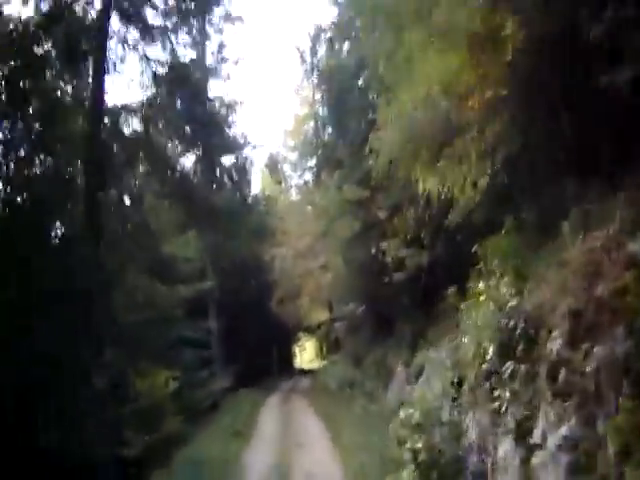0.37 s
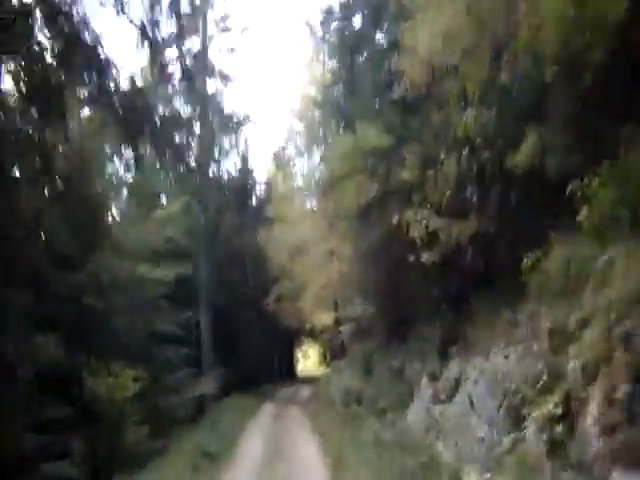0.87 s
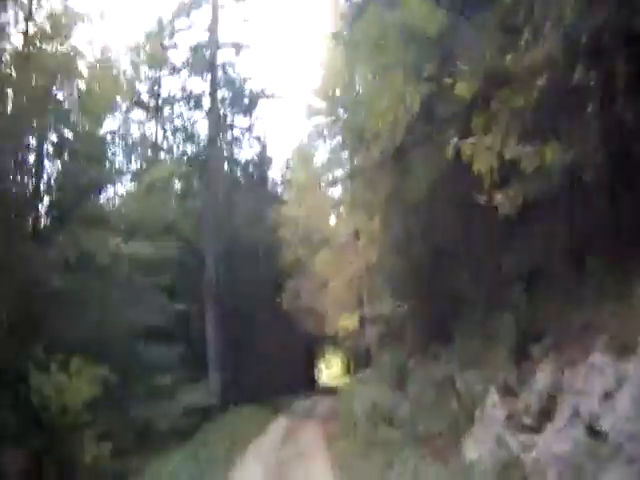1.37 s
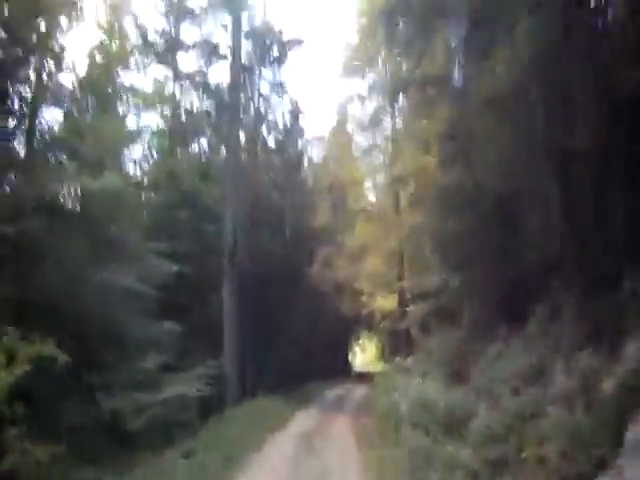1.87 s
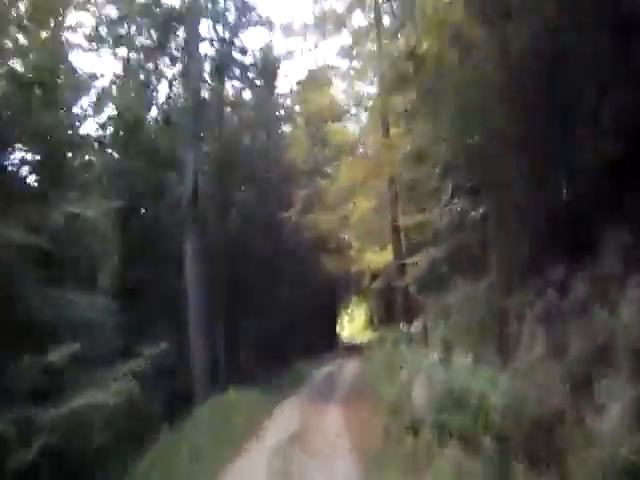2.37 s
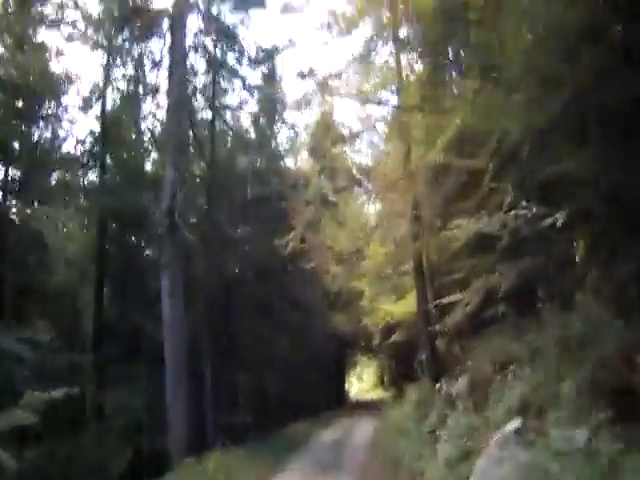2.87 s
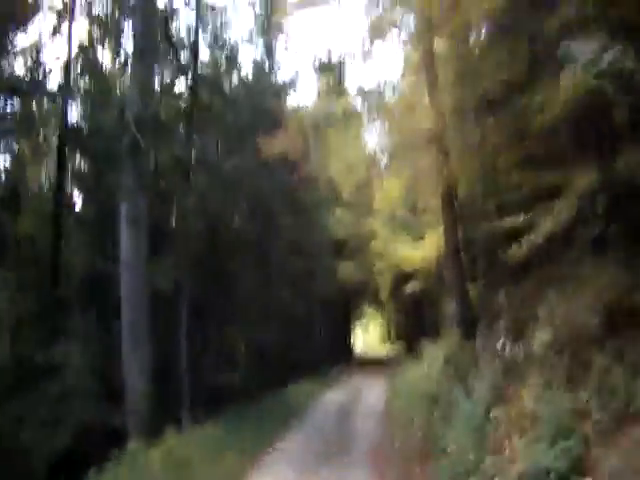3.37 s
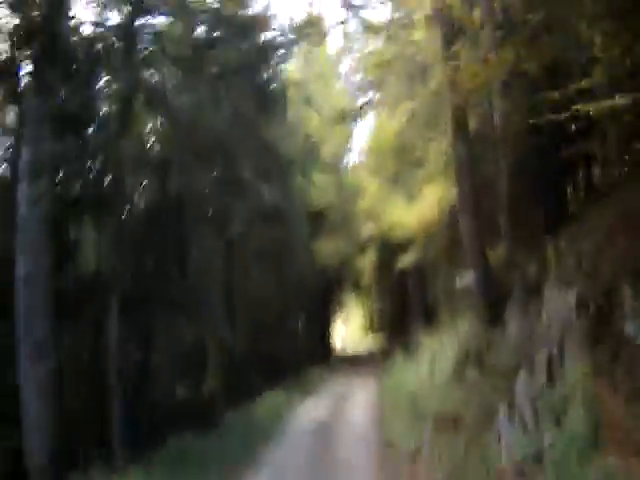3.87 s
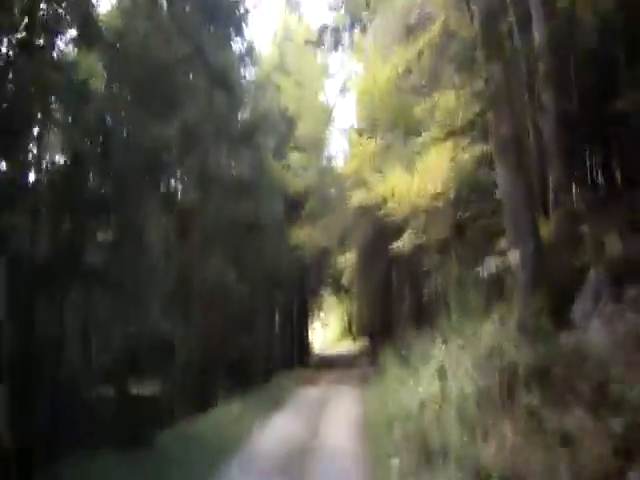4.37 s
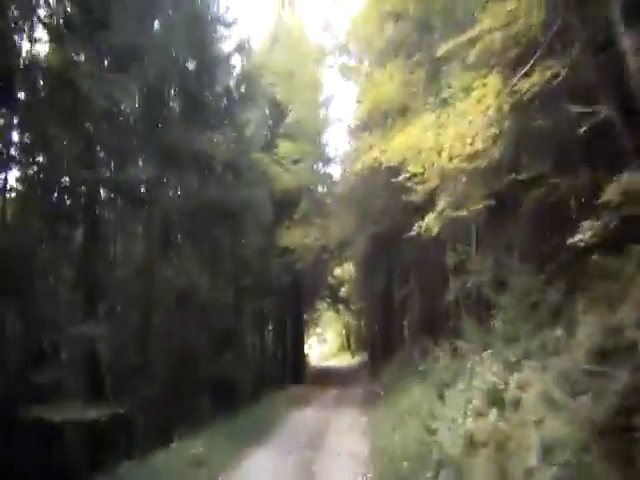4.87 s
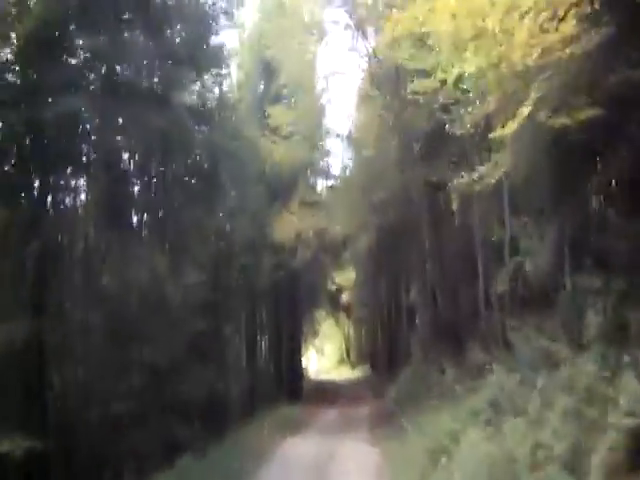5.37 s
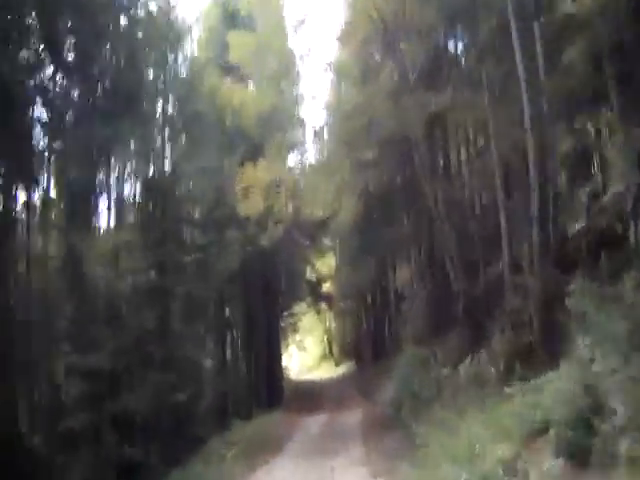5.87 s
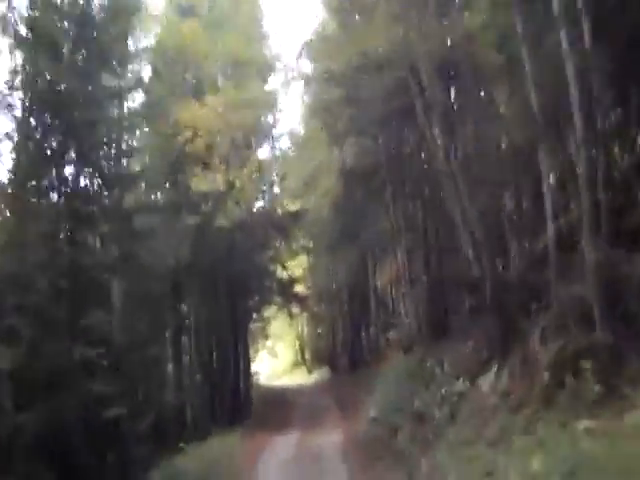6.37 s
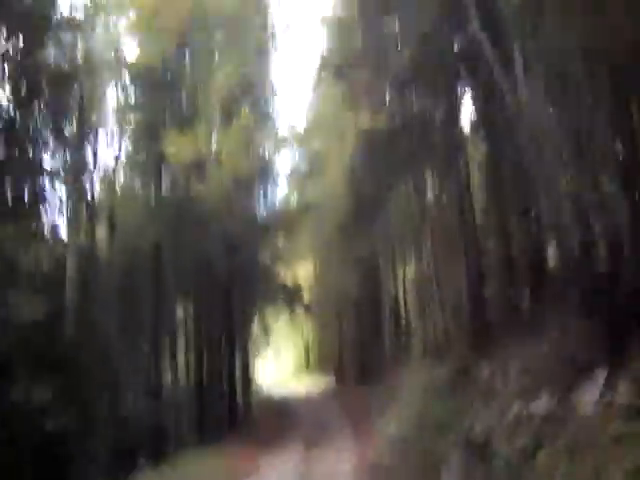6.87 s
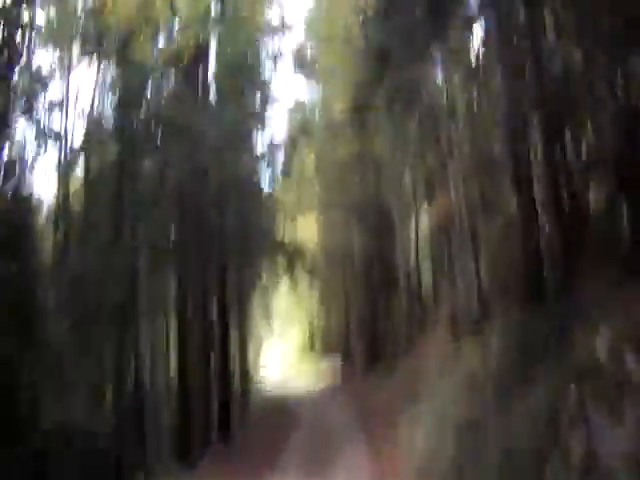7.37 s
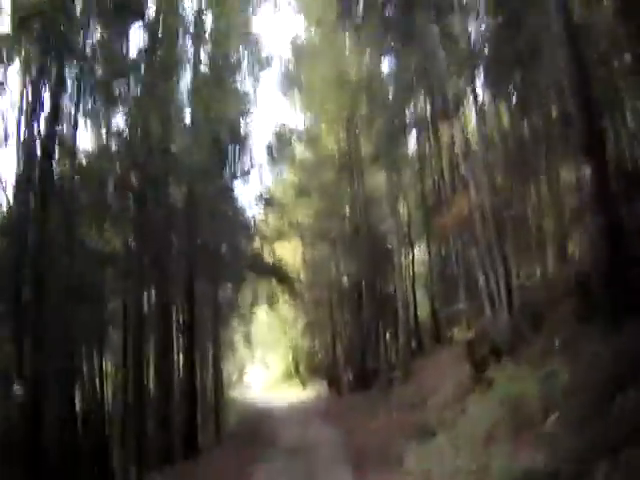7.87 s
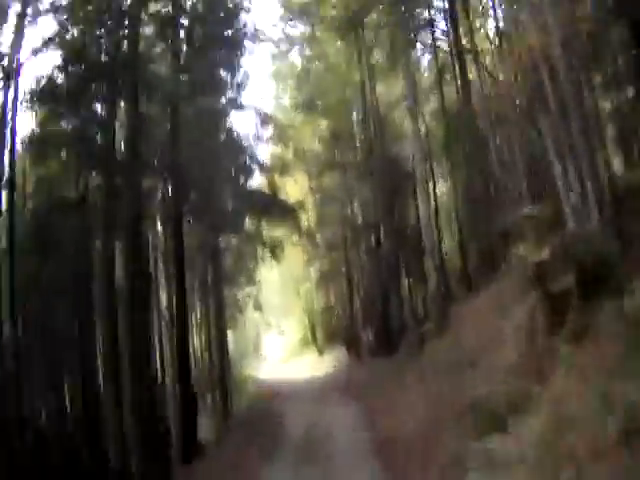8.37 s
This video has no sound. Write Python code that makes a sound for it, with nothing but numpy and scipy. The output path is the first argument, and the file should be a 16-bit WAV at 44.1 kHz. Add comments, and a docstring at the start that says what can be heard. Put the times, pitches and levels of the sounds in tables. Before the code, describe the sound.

A bike rides fast over rough gravel in a forest, heard by a microphone inside a hard plastic case fixed to it. From the start, short dry rattles chatter over a quiet tyre crunch and low frame rumble. A hard clack lands near 0.7 seconds, with more knocks and buzzing bursts until about 1.7. The ride then calms until roughly 2.3, leaving mostly soft gravel and faint hiss. Clatter resumes at 2.4; a very sharp knock at 3.25 opens the roughest passage, with dense heavy rattling and louder gravel through about 4.3. Smaller uneven rattles follow, with a strong clack at 5.4 and a buzzy burst near 6. Thudding knocks return around 6.9, 7.2 and 7.5, then another cluster at 8.0 to 8.2 before lighter rattling at the end. Low wind is barely noticeable, swelling with bumps. Everything is close, centred and dry.

```python
"""Cased microphone on a mountain bike

A small camera in a hard plastic case rides down a gravel forest track. Its mount rattles in short bursts and
harder bumps knock it: both are noise contacts ringing the case resonances. Under that lie shaped noises: tyres
on gravel, frame rumble and low wind. One microphone feeds two channels; each adds its own faint hiss."""
import sys
import numpy as np
from scipy import signal
from scipy.fft import rfft, irfft, next_fast_len
from scipy.io import wavfile
from scipy.ndimage import uniform_filter1d, map_coordinates

SR = 44100
rng = np.random.default_rng(int(sys.argv[2]) if len(sys.argv) > 2 else 0)


def natural_amplitude(level_db):
    """Convert a level in decibels to a linear amplitude factor, elementwise."""
    exponent = np.asarray(level_db, float) / 20
    return 10 ** exponent


def transcribe(signal):
    """Save signal, clipped to [-1, 1], as a 16-bit WAV file at the path in sys.argv[1]."""
    frames = np.atleast_2d(signal).T
    limited = np.clip(frames, -1, 1)
    pcm = np.round(limited * 32767).astype(np.int16)
    wavfile.write(sys.argv[1], SR, pcm)


N = 374850

# case resonances in four groups (low, middle, upper, top): centre_hz, width_hz, level_db
CASE_MODES = [
    [(645, 153, -10), (864, 111, -1), (1090, 169, -2)],
    [(1397, 164, -10.5), (1540, 86, -4), (1984, 208, -2.5), (2184.6, 113, 0.5), (2456, 45, -10),
     (2787, 130, -12.5)],
    [(3275, 280, -3.5), (3646, 102, 2), (4210, 170, -5), (4650, 500, -8), (5263, 230, 1.5)],
    [(6257, 270, 3), (7100, 980, -5.5), (8690, 500, -3.5), (10930, 910, -13), (13100, 1900, -18)],
]
# levels along the track: time_s, gravel_db, wind_db
TRACK = [(0.0, -56, -80), (0.42, -56.5, -90), (0.78, -51, -85), (1.32, -55.5, -82), (2.03, -57.5, -91),
         (2.29, -58.5, -93), (2.46, -55, -87), (3.55, -53.5, -80), (3.88, -46.5, -84), (4.31, -55, -86),
         (5.14, -59, -94), (5.35, -55, -81), (5.73, -59, -96), (6.15, -59, -86), (6.65, -58, -90),
         (6.86, -56, -83), (7.43, -55, -88), (7.79, -58.5, -93), (8.26, -54.5, -83), (8.5, -55, -85)]


def unit(x):
    """Scale to rms 1."""
    return x / np.sqrt(np.mean(x ** 2) + 1e-20)


def filtered(x, response):
    """x times a complex response of frequency in Hz."""
    size = next_fast_len(N + 8192)
    return irfft(rfft(x, size) * response(np.fft.rfftfreq(size, 1 / SR)), size)[:N]


def coloured(x, points):
    """x shaped by (Hz, dB) points, interpolated over log frequency, rms 1."""
    hz, db = np.transpose(points)
    return unit(filtered(x, lambda f: natural_amplitude(np.interp(np.log(f + 1), np.log(hz), db, -120, -120))))


def ring(x, modes):
    """x through a group of resonances, impulse response energy 1, rolled off above the last mode."""
    def response(f):
        """Sum of band-pass modes; neighbours alternate in sign."""
        total = 0
        for k, (centre_hz, width_hz, db) in enumerate(modes):
            damping = 1j * f * width_hz
            total = total + (-1) ** k * natural_amplitude(db) * damping / (centre_hz ** 2 - f * f + damping)
        u = 1j * f / (1.036 * modes[-1][0])
        total = total / (1 + u + u * u) ** 2
        return total / np.sqrt(np.mean(np.abs(total) ** 2))
    return filtered(x, response)


def wobble(knots_per_s):
    """Smooth curve through standard normal knots."""
    knots = rng.standard_normal(int(N * knots_per_s / SR) + 4)
    return map_coordinates(knots, [np.arange(N) * knots_per_s / SR])


def contacts(per_s, spread_db):
    """Random tiny impacts of uneven size, rms 1."""
    hit = rng.random(N) < per_s / SR
    return unit(hit * rng.standard_normal(N) * natural_amplitude(spread_db * rng.standard_normal(N)))


def rattle():
    """Loose contacts chatter around one hard contact a burst and ring the case; also returns the low shaking."""
    (low, middle, upper), hardest = shaking(rise_edge=2.27, fall_edge=2.15)
    flutter = natural_amplitude(0.44 * wobble(130))  # contact force changes every few milliseconds
    low_hits = low * flutter * contacts(1500, 5) + natural_amplitude(16) * hardest[0]
    middle_hits = middle * flutter * contacts(2500, 0.5) + natural_amplitude(17) * hardest[1]
    upper_hits = upper * flutter * contacts(3500, 3) + natural_amplitude(5) * hardest[2]
    sound = ring(low_hits, CASE_MODES[0]) + ring(middle_hits, CASE_MODES[1])
    sound += ring(upper_hits, CASE_MODES[2]) + natural_amplitude(-17.5) * ring(upper_hits, CASE_MODES[3])
    return sound, low


def shaking(rise_edge, fall_edge):
    """Shaking amplitude of the three lower groups, burst powers added, and each burst's hardest contact."""
    low_over_db, upper_over_db = -0.5, -2.5  # added to the breadth
    half = SR // 10
    ms = np.arange(-half, half) * 1000 / SR
    power, hardest = np.zeros((3, N + SR)), np.zeros((3, N + 1))
    for s, db, rise_ms, fall_ms, breadth_db in bursts():
        gains = natural_amplitude(db + np.array([breadth_db + low_over_db, 0, breadth_db + upper_over_db]))
        rising = (np.abs(ms) / rise_ms) ** rise_edge
        falling = (np.abs(ms) / fall_ms) ** fall_edge
        envelope = natural_amplitude(-6.5 * np.where(ms < 0, rising, falling))
        peak = round(s * SR)
        power[:, peak:peak + len(ms)] += (gains[:, None] * envelope) ** 2  # delayed by half, cut below
        hardest[:, peak] = gains * np.sign(rng.standard_normal())
    return np.sqrt(power[:, half:half + N]), hardest[:, :N]


def bursts():
    """The listed rattle bursts plus small ones at random times."""
    # peak_s, level_db, rise_ms and fall_ms (to -6.5 dB), breadth_db (share of the outer groups)
    big = [(.045,-45,17,3.8,-5),(.083,-47,3.1,3.3,0),(.267,-53.5,4.6,22,2.5),(.453,-35,11,15,-8.5),(.543,-50.5,6.5,21,-6),
           (.602,-45,17,11,-4),(.684,-27,12,10.7,-13),(.738,-34.5,17,5.2,-21),(.782,-49,8,11,-9),(.799,-33.5,7.1,18,-7.5),
           (.903,-42,29,7.2,-0.5),(.915,-51,7,23,-16),(.946,-46.5,21,10,-22),(.962,-41.5,8,2.6,-10),(1.046,-46,9.8,8,-8.5),(1.067,-53,15,14,-22),
           (1.175,-35.5,7.5,3.9,-18),(1.212,-41.5,17,6.4,-10.5),(1.244,-35.5,3.8,9.3,-13.5),(1.301,-28,15.3,7.6,-18),(1.356,-36.5,10,16,-14),
           (1.411,-46.5,8.7,4.4,-9),(1.51,-38,15,8.4,-17.5),(1.524,-39,7,3.2,-22),(1.582,-44.5,20,14,-8),(1.662,-35,7.7,14,-16),
           (1.681,-48.5,12,9.6,-1),(1.759,-49.5,11,18,-7),(1.798,-52,25,10,-6),(1.857,-50,3,4.6,-11),(1.957,-52.5,9,18,-8),(2.035,-50.5,33,12,-6.5),(2.307,-44.5,12,20,-9),(2.376,-28.5,3.6,16.3,-19.5),
           (2.444,-47.5,3.3,9,-1.5),(2.482,-36.5,8.5,13,-9.5),(2.507,-45,18,5.6,1.5),(2.574,-35.5,8.3,5,1),(2.594,-37.5,25,13,-10),
           (2.658,-39.5,8.6,9,-15),(2.674,-37,11,7,-19),(2.724,-39,3.4,2.5,-27),(2.771,-48,4.4,3.6,-19),(2.798,-38,2.6,7.3,-12),
           (2.863,-37,12.4,13,-8.5),(2.93,-53,13,12,0),(2.968,-42.5,4,10,-16),(2.999,-51,18,15,-20),(3.024,-38.5,17,12,-13.5),
           (3.13,-46,16,11,-7.5),(3.177,-45.5,11,21,-3.5),(3.269,-39,28,10,-7.5),(3.287,-39,12,10,-6),(3.33,-27.5,4.9,12,-27),
           (3.345,-25.5,7.2,15.4,-14.5),(3.378,-41.5,39,4.7,-6),(3.482,-34.5,10.7,10.5,-12),(3.521,-34.5,5.4,5.1,-13.5),(3.544,-55,19,3,-7),
           (3.607,-40,6.8,11,-26),(3.66,-22.5,6.8,18.7,-19),(3.748,-33,11.6,22,-8),(3.773,-32.5,21,14,-9),(3.788,-32,15,22,-11.5),
           (3.831,-47.5,46,51,-2.5),(3.886,-39.5,4,3.5,5),(3.913,-38,21,4.6,-8),(3.968,-33.5,5.7,7.3,-12),(3.992,-31,21,13.6,-19.5),
           (4.062,-53,20,9,-15),(4.147,-49,26,20,-2),(4.176,-36,36,20,-8.5),(4.227,-38,13,35,-12.5),(4.256,-32,12,4.8,-8.5),
           (4.268,-34.5,5.3,11,-7),(4.38,-35,2.5,15.5,-16.5),(4.405,-40,10,10.3,-15.5),(4.458,-41.5,7.6,5.6,-14),(4.56,-38,10,14,-13),
           (4.617,-42.5,8,14,-15),(4.643,-36.5,12,10,-17),(4.669,-41,19,5.9,-11.5),(4.814,-43.5,7.2,7.8,-11),(4.831,-37.5,6.7,19,-12),
           (4.945,-42.5,18,2.3,-11),(5.002,-40,2.6,7.2,-15),(5.101,-50,5.8,11,-23),(5.156,-49,14,9.5,-16),(5.187,-37.5,3.4,8,-21),
           (5.202,-41.5,9,14,-14),(5.273,-45,45,9,-6),(5.293,-46,7,8,-9),(5.324,-42,1.5,3.9,-1),(5.376,-47,7,15,-3),
           (5.439,-36.5,12,3.6,-14),(5.495,-49,5,5.1,-25),(5.527,-51,4,8,-14),(5.587,-38,15,12,-14),(5.605,-35,12,7.2,-34),
           (5.617,-42.5,6,6.6,-21),(5.755,-48.5,5.6,14,-18),(5.876,-44,5.7,7,-11),(5.948,-40,3,11,-9),(5.969,-29,10.6,13.7,-19.5),
           (6.015,-37.5,7.5,2.6,-9.5),(6.03,-38,5,3.2,-12),(6.068,-40.5,3.7,6.2,-20),(6.082,-46,7,20,-12),(6.122,-43.5,10,12,-7.5),
           (6.152,-49,13,35,-16),(6.279,-52.5,4,6.8,-20),(6.389,-35,12,7,-18),(6.402,-35.5,9.3,22.4,-20),(6.5,-52.5,10,13,-13),(6.565,-54.5,6.2,12,0),(6.67,-40,7.1,8.6,-24),
           (6.684,-46,7,8.1,-27),(6.766,-41,4.9,9,-14),(6.804,-43.5,7,4.2,-16),(6.856,-38.5,10.4,17,-8.5),(6.89,-51,12,8,0.5),
           (6.938,-34.5,19,5.7,-13),(6.955,-47,11,22,1.5),(7.046,-43,17,9,-9),(7.059,-43,7.5,10.4,-4.5),(7.103,-49,4.6,2.2,-23),
           (7.176,-33,12,12.5,-11),(7.213,-38,7.8,5.1,-30),(7.252,-39.5,8.4,9.4,-24),(7.268,-46,9,3.2,-22),(7.325,-31,9.3,16.3,-24),
           (7.441,-32,20.4,9.3,-14),(7.47,-40,35,6,-12),(7.56,-34,22,11.4,-4.5),(7.69,-46,25,11.5,-8.5),(7.834,-40.5,5.2,10.3,-11.5),
           (7.944,-49,4,16,-10),(8.053,-32.5,12.3,20,-13.5),(8.078,-41,14,3.9,-24),(8.117,-33,11,17.5,-11.5),(8.162,-32.5,8.8,9.4,-14),
           (8.178,-31.5,7.9,7.6,-16.5),(8.228,-42.5,9,17,-11),(8.313,-50.5,8.4,12,-13),(8.432,-40,14.5,14,-25),(8.458,-40,17,3.1,-22),
           (8.481,-42.5,4,23,-12)]
    small_per_s = 9
    draw = rng.random((round(small_per_s * N / SR), 5))
    peak_s = draw[:, 0] * N / SR
    level_db = -57 + 4.5 * (4 * draw[:, 1] - 2)
    rise_fall_ms = 10.8 * (0.4 + 1.2 * draw[:, 2:4])
    breadth_db = -5.5 + 12 * (draw[:, 4] - 0.5)
    return np.vstack([big, np.c_[peak_s, level_db, rise_fall_ms, breadth_db]])


def knocks():
    """Hard knocks and ticks: noise contacts of a few ms ring all case groups at once and thump the frame."""
    # start_s, level_db (upper group, before the common gain), low_db and middle_db (relative to it)
    hits = [(0.4447,-27,-6,-10.5),(.6712,-19,-4.5,3),(.7971,-28.5,-4,11),(.872,-21.5,0,1.5),(0.9045,-47,-10,-8),
            (0.9818,-32,-12,-3),(0.992,-38,-28,-4),(1.0097,-31,-34,-29),(1.2121,-27.5,-8,-18),(1.285,-28.5,-6,3),
            (1.4438,-33.5,-5,-0.5),(1.6633,-32,-11,6),(2.292,-43,6.5,6),(2.368,-28,-5,2),(2.4817,-32.5,-5,7),(2.5524,-23,2.4,2),
            (2.8554,-42,7.5,12),(3.001,-35,-12,-2),(3.246,-16,-3.5,4),(3.2694,-31,-11,-9),(3.3485,-23.5,-2,-6),
            (3.4187,-24.5,-5.5,5),(3.4798,-33,-7,11),(3.6536,-31,-15,13.5),(3.7468,-27,-10,-10),(3.7884,-30,-13,11.5),
            (3.832,-29.5,-31,-20),(3.8848,-27.5,-3,-7),(3.9174,-35.5,6.5,-6),(4.037,-26,-5,3.5),(4.2058,-27,-20,-7),
            (4.2538,-23,1,-2),(4.571,-29,-14,-15),(4.7132,-33,5,6.5),(4.7298,-36.5,-15,-3),(4.8815,-30,7,5),
            (5.247,-24.5,-5,5.5),(5.3303,-35,-24,-5),(5.4243,-18.5,2,1),(5.5757,-35,-5,-6),(5.692,-43.5,-26,-18),
            (6.0138,-40,9,7),(6.109,-31.5,-22,-8),(6.7287,-29,-16,-2.5),(6.85,-41,-3,-6),(6.937,-24.5,5.5,-5),(6.959,-42,7,-8),
            (7.1596,-22.5,3,4.5),(7.2973,-31.5,-21,-4),(7.4985,-35.5,-12,4),(7.5367,-21.5,-0.5,3),(7.599,-40,-19,-8),
            (7.9736,-30.5,-21,-5.5),(8.115,-22,-1,8.5),(8.1482,-41,1,5),(8.1694,-41,0,7),(8.1898,-33.5,-11,-11),(8.3526,-35,-10,0)]
    common_gain_db = 12.5
    t60_s = np.array([[0.014], [0.016], [0.012], [0.007]])  # per group
    rise_s = np.array([[0.0015], [0.0012], [0.0007], [0.0003]])  # the parts press together
    frame_modes = [(199, 46, 14), (327, 140, -15)]  # centre_hz, width_hz, level_db
    t = np.arange(600) / SR
    blows = np.zeros((4, N + len(t)))
    for s, db, low_db, middle_db in hits:
        top_db = -22.5 - 0.3 * low_db - 0.2 * middle_db  # light ticks are bright, heavy knocks dull
        contact = rng.standard_normal((4, len(t))) * natural_amplitude(-60 * t / t60_s)
        contact *= 1 - np.exp(-t / rise_s)
        contact /= np.linalg.norm(contact, axis=1, keepdims=True)
        gains = natural_amplitude(db + common_gain_db + np.array([[low_db], [middle_db], [0], [top_db]]))
        start = round(s * SR)
        blows[:, start:start + len(t)] += gains * contact
    case = sum(ring(blow[:N], modes) for blow, modes in zip(blows, CASE_MODES))
    return case + natural_amplitude(-22) * ring(blows[0, :N], frame_modes)


def track_level(db):
    """Amplitude along the track, interpolated in dB."""
    return natural_amplitude(np.interp(np.arange(N) / SR, np.transpose(TRACK)[0], db))


def ground_level(shake):
    """Gravel amplitude: rough ground outlasts a burst and makes the gravel louder."""
    smooth_s, rough_db = 0.04, -6
    power = uniform_filter1d(shake ** 2, round(smooth_s * SR))
    power = uniform_filter1d(power, round(smooth_s * SR / 2))
    rough = np.sqrt(np.abs(power))
    return np.hypot(track_level(np.transpose(TRACK)[1]), natural_amplitude(rough_db) * rough)


def tyres(ground):
    """Gravel crunches under the tyres: noise and tiny impacts in uneven patches, faintly ringing the case top."""
    # freq_hz, density_db (per Hz)
    gravel_spectrum = [(240, -43), (400, -23), (499, -19), (636, -6.5), (886, -8), (1220, -15), (1490, -6),
                       (1680, -9.5), (2070, -2), (2390, -9), (3050, -16), (3440, -14), (4490, -14),
                       (5180, -13.5), (5600, -10), (7280, -60), (12300, -120)]
    crunch = rng.standard_normal(N) + 0.54 * contacts(450, 6.5)
    crunch = crunch * natural_amplitude(1.1 * wobble(16) + 1.6 * wobble(70))
    gravel = coloured(crunch, gravel_spectrum) + natural_amplitude(-20.5) * unit(ring(crunch, CASE_MODES[3]))
    return ground * gravel


def frame_rumble(ground, shake, bump):
    """The frame rumbles as wavering low noise, more on loud gravel or when shaken or bumped."""
    # freq_hz, density_db (per Hz)
    frame_spectrum = [(71, -41), (120, -21.5), (205, -1), (334, -5.5), (383, -3.5), (495, -9), (520, -4),
                      (680, -14), (1140, -120)]
    rolling_db, db_per_gravel_db = -76, 1.03
    rumble = coloured(rng.standard_normal(N) * natural_amplitude(wobble(22) + 1.45 * wobble(6)), frame_spectrum)
    rolling = natural_amplitude(rolling_db) * (ground / np.median(ground)) ** db_per_gravel_db
    return np.sqrt(rolling ** 2 + (natural_amplitude(-14.5) * shake) ** 2 + bump ** 2) * rumble


def bumps():
    """How hard each wheel bump loads the frame: a quick rise, then decay."""
    # start_s, level_db (before the common gain)
    thuds = [(0.031, -47), (0.228, -51), (0.438, -46), (0.682, -45), (0.889, -42.5), (1.208, -49.5),
             (1.241, -50), (1.286, -48.5), (1.399, -56), (1.553, -49), (1.669, -55), (1.953, -53),
             (2.294, -64), (2.439, -50), (2.565, -45), (2.939, -49), (3.264, -44), (3.416, -49),
             (3.659, -45), (3.751, -50), (3.826, -46), (3.912, -46), (4.2, -48), (4.562, -53), (4.713, -60),
             (4.88, -52), (5.423, -44.5), (6.013, -61), (6.86, -56), (6.945, -43.5), (7.161, -43.5),
             (7.382, -57), (7.546, -43), (8.021, -59), (8.11, -47), (8.407, -58)]
    common_gain_db, rise_s, t60_s = -2.5, 0.003, 0.11
    s, db = np.transpose(thuds)
    t = np.arange(SR // 4) / SR
    blows = np.zeros(N)
    blows[np.round(s * SR).astype(int)] = natural_amplitude(db + common_gain_db)
    envelope = (1 - np.exp(-t / rise_s)) * natural_amplitude(-60 * t / t60_s)
    return np.abs(signal.fftconvolve(blows, envelope)[:N])


def wind(bump):
    """Gusty noise at the bottom of the spectrum; it swells with each bump."""
    # freq_hz, density_db (per Hz)
    wind_spectrum = [(12, -36), (20, -10.5), (108, -5.5), (130, -6.5), (170, -29), (290, -120)]
    gusts = coloured(rng.standard_normal(N) * natural_amplitude(4.1 * wobble(9.8)), wind_spectrum)
    return np.hypot(track_level(np.transpose(TRACK)[2]), natural_amplitude(-12.5) * bump) * gusts


def whine():
    """Electronics leak a comb of faint tones at half-odd multiples of one frequency."""
    base_hz = 450.1
    t = np.arange(N) / SR
    tones_hz = (np.arange(20, 34) + 0.5) * base_hz
    return sum(natural_amplitude(-98 - 0.3 * k) * np.sin(2 * np.pi * hz * t) for k, hz in enumerate(tones_hz))


def hiss(white_db):
    """White noise thinned below 500 Hz."""
    return natural_amplitude(white_db) * filtered(rng.standard_normal(N), lambda f: f * f / (f * f + 500 ** 2))


def scene():
    """All vibration reaches one microphone, whose port notches a narrow band."""
    port_hz, width_hz, depth = 5640, 450, 1.48

    def port(f):
        """One minus a scaled resonance."""
        damping = 1j * f * width_hz
        return 1 - depth * damping / (port_hz ** 2 - f * f + damping)

    sound, shake = rattle()
    ground, bump = ground_level(shake), bumps()
    sound = sound + knocks() + tyres(ground) + frame_rumble(ground, shake, bump) + wind(bump)
    return np.tile(filtered(sound, port), (2, 1))


def low_pass(x):
    """Removes everything above the highest recorded frequency."""
    return signal.sosfilt(signal.butter(12, 15710, fs=SR, output="sos"), x)


def record(dry):
    """Shared amplifier hiss and whine, a separate hiss in each channel, and the camera's band limit."""
    top_hz = 15300
    shared = dry + whine() + hiss(-80)
    both = [filtered(channel + hiss(-72), lambda f: f < top_hz) for channel in shared]
    return low_pass(np.array(both))


dry = scene()
out = record(dry)
transcribe(out)
```